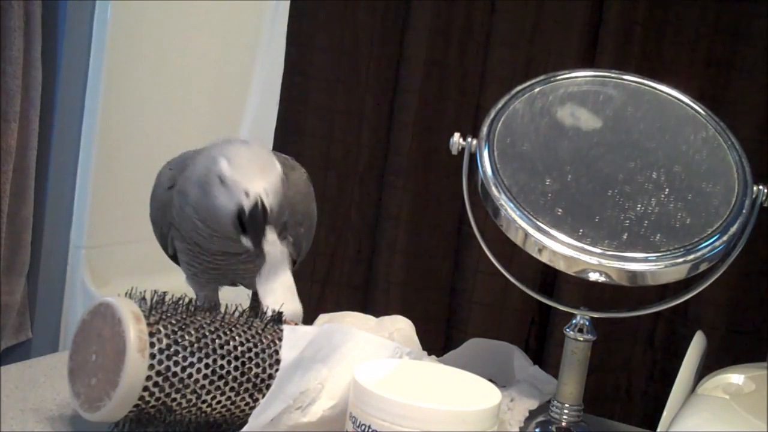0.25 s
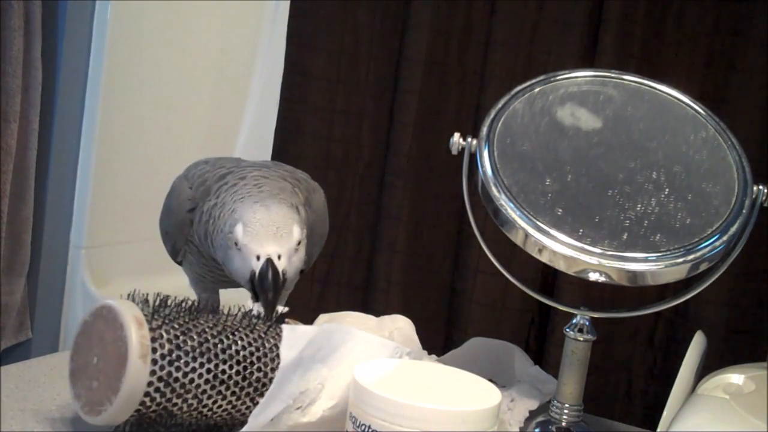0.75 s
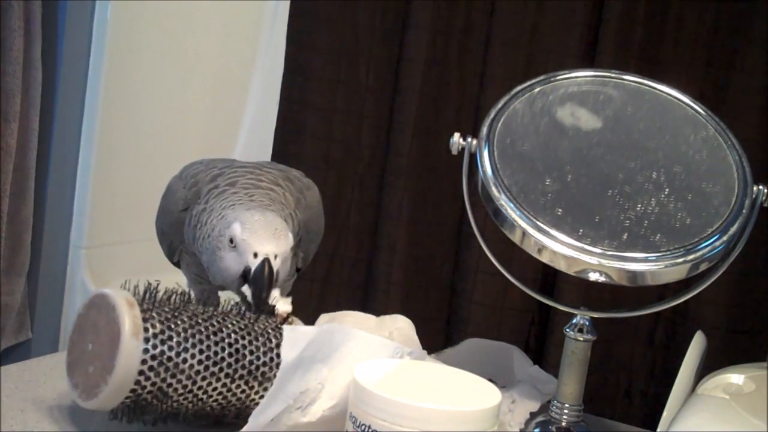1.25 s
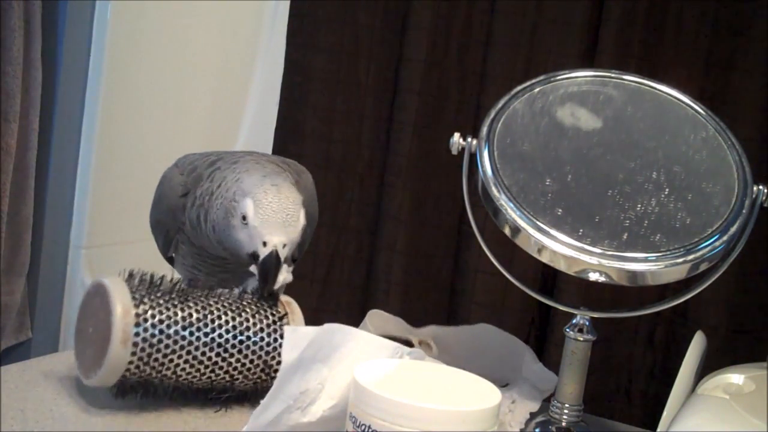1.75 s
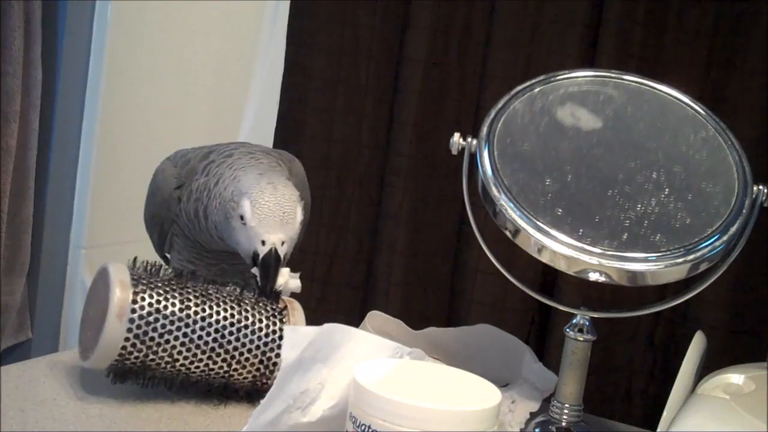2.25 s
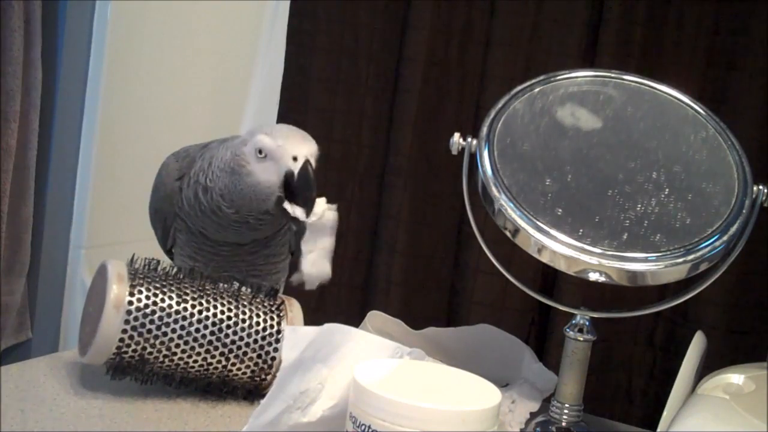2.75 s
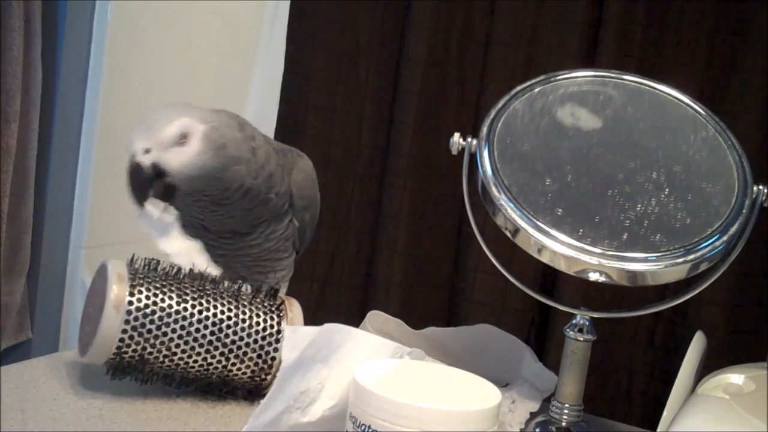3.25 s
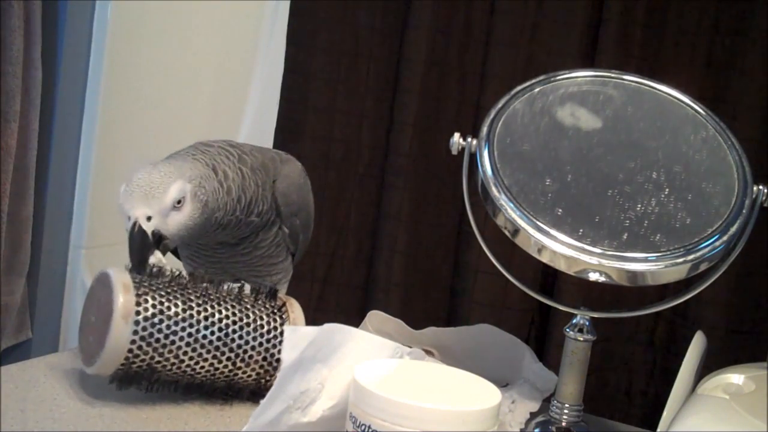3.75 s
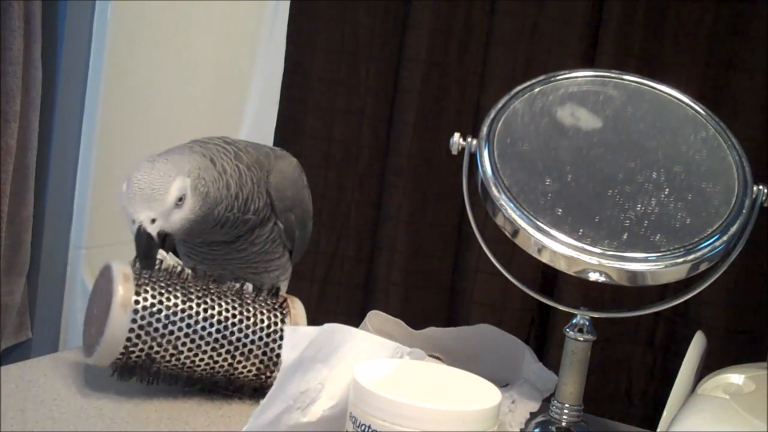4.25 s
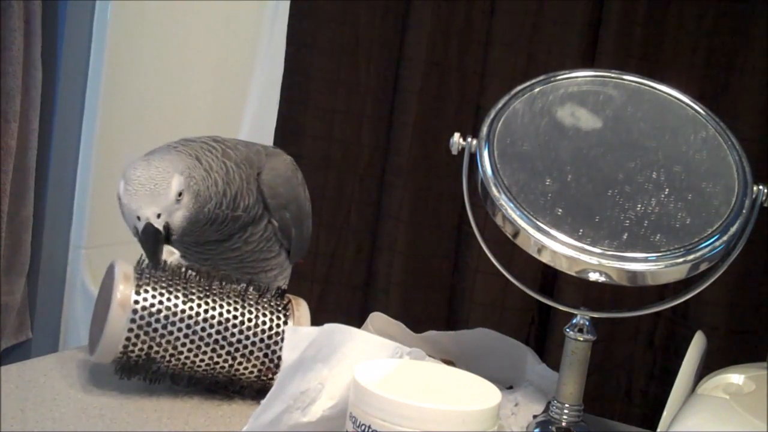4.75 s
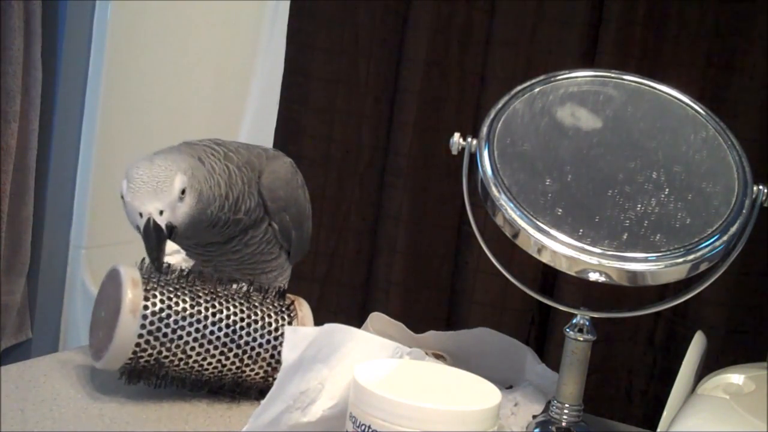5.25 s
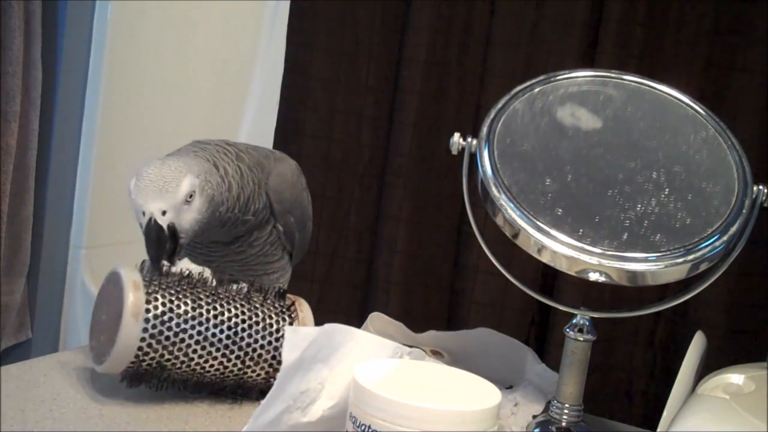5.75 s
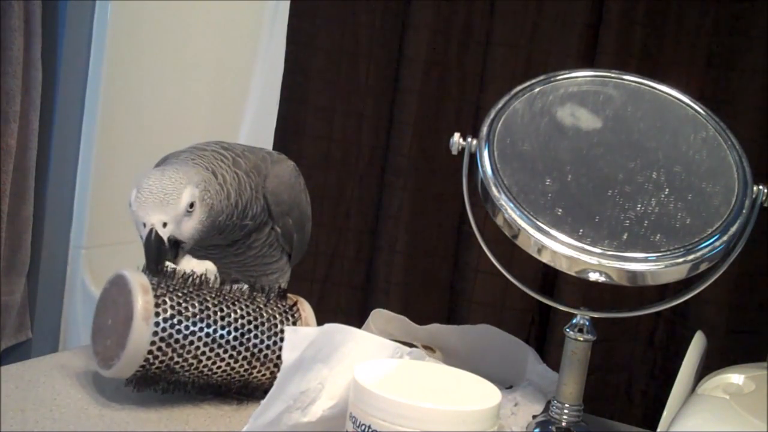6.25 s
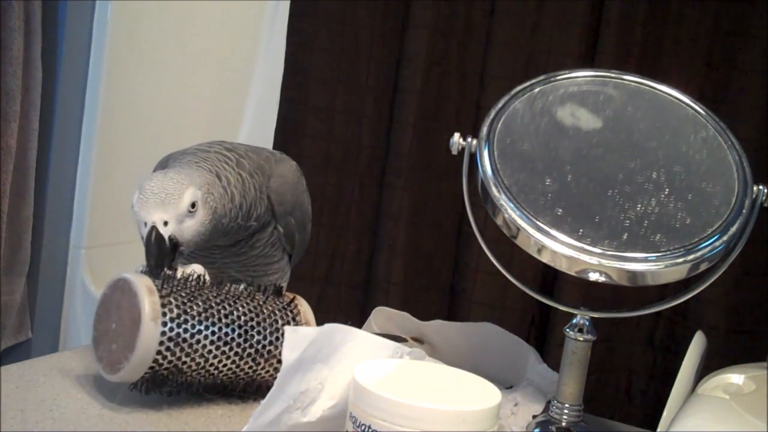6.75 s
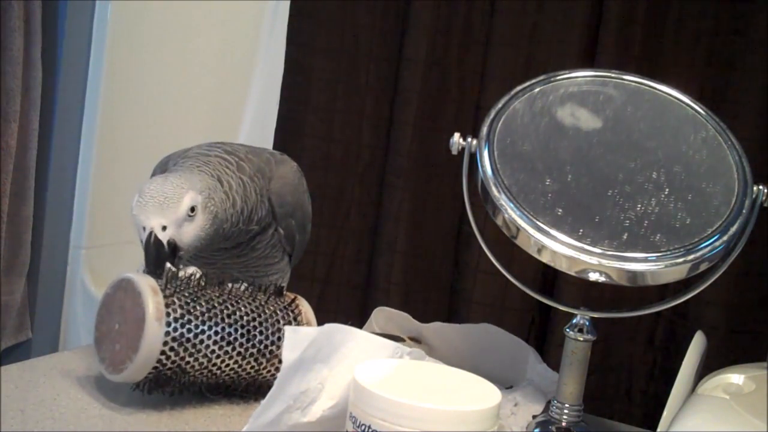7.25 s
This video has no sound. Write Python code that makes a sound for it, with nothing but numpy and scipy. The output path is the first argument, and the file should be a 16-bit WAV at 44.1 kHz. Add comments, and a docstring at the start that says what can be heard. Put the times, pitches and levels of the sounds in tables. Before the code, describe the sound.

Steady soft ventilation hiss and a very faint low mains hum fill a small bathroom with a short, bright ring. From the start a parrot's beak crackles tissue in short, thin, dry bites, close and left of centre. At 0.67 s the round hairbrush beneath it gives a muted knock; light bristle ticks follow. Around 1.15-1.65 s it rolls: a raspy bristle scrape, crowded sharp snaps, soft bumps and low counter rumble. At 1.85 s comes the loudest event, a hard hollow clack with smaller rattling rebounds. A gentler roll with ticks and dull bumps comes at 2.25-2.5 s. Then mainly delicate paper crackling continues, with a modest double knock near 4.34 s and isolated ticks. A small snap sounds at 6.5 s; the faint rustle stops at about 6.55 s, leaving sparse, quiet nibbles and ticks over the hiss until 7.5 s.

```python
"""Ventilation hiss and mains hum run throughout; from the start a parrot's beak crackles tissue paper in short bites.
From 0.67 s the round hairbrush it stands on snaps (noise burst and ringing bristle) and knocks (struck modes).
From 0.75 s it rolls at times: bristles scrape as filtered impulses and the counter rumbles under random steps.
Snaps crowd near 1.2 s, the hardest knock falls at 1.85 s, then both thin out; the rustle between bites stops
at 6.55 s and the last snaps and bites follow. Noise-built reflections give a short bathroom ring."""
import sys
import numpy as np
from scipy import signal
from scipy.fft import rfft, irfft
from scipy.io import wavfile
from scipy.ndimage import uniform_filter1d

SR = 44100
rng = np.random.default_rng(int(sys.argv[2]) if len(sys.argv) > 2 else 0)


def inscribe(sig):
    """Save sig as 16-bit PCM at rate SR to the path in sys.argv[1].

    A 1-D sig is mono; a 2-D sig holds one channel per row.
    Samples are clipped to [-1, 1] before scaling.
    """
    pcm = np.round(np.clip(np.atleast_2d(sig).T, -1, 1) * 32767)
    wavfile.write(sys.argv[1], SR, pcm.astype(np.int16))


N = 331632
TIME_S = np.arange(N) / SR
GRID_HZ = np.fft.rfftfreq(1024, 1 / SR)


def amp(db):
    """Converts dB to an amplitude factor."""
    return 10 ** (np.asarray(db) / 20)


def unit(x):
    """Scales to an rms of one."""
    return x / np.sqrt(np.mean(x ** 2) + 1e-20)


def read(points, hz):
    """Reads a table on a logarithmic frequency axis."""
    f, value = np.transpose(points)
    return np.interp(np.log(hz + 1), np.log(f + 1), value)


def bump(hz, centre_hz, width_hz):
    """A bell of height one."""
    return np.exp(-.5 * ((hz - centre_hz) / width_hz) ** 2)


def add(mix, start_s, sound):
    """Mixes a sound in at a time."""
    part = mix[..., max(round(start_s * SR), 0):][..., :sound.shape[-1]]
    part += sound[..., :part.shape[-1]]


def butter(x, order, hz, kind="low"):
    """Butterworth filter."""
    return signal.sosfilt(signal.butter(order, hz, btype=kind, fs=SR, output="sos"), x)


def colour(x, gain_db):
    """Minimum-phase filter with gain_db on GRID_HZ."""
    log_gain = np.log(amp(np.concatenate([gain_db, gain_db[-2:0:-1]])))
    taps = np.fft.ifft(np.exp(np.conj(signal.hilbert(log_gain)))).real
    return signal.oaconvolve(x, taps)[:len(x)]


def place(x, side_db):
    """Pans the treble left at constant mean power; bass stays near the middle."""
    tilt_db = side_db * read([(2500, 0.047), (6000, 0.18), (8000, 0.87), (12000, 1.35)], GRID_HZ)
    mean_db = 10 * np.log10((1 + amp(tilt_db) ** 2) / 2)
    return np.array([colour(x, tilt_db - mean_db), colour(x, -mean_db)])


def alike(z, same):
    """Mixes the left spectrum into the right, by likeness 0-1."""
    z[1] = same * z[0] + np.sqrt(1 - same ** 2) * z[1]


def ring(modes, t):
    """Struck modes, dying away; neighbours swing in opposite directions."""
    out = np.zeros(len(t))
    for k, (hz, db, t60_s) in enumerate(modes):
        out += (-1) ** k * amp(db - 60 * t / t60_s) * np.sin(2 * np.pi * hz * t)
    return out


def crackle(per_s, spread_db):
    """Tiny slips at random moments: most are weak, a few strong."""
    size = amp(spread_db * np.minimum(rng.exponential(1, N), 4)) * rng.choice([-1, 1], N)
    return unit(size * (rng.random(N) < per_s / SR))


# ventilation spectrum: (frequency [Hz], relative level [dB per Hz])
AIR = [(20, -37), (45, -6), (62, -8.5), (90, -7.5), (140, -10.5), (230, -8), (400, -9.5), (760, -12.5),
       (1500, -15), (4600, -17), (8000, -22), (10000, -21.5), (14200, -23), (14700, -67)]
# ventilation balance, vent on the left: (frequency [Hz], left-right [dB])
AIR_SIDE = [(60, 2.5), (200, 5), (700, 9), (1300, 7.5), (2400, 4.5), (5000, 0.5), (15000, 1)]


def air(hiss_db=-59.5, hum_hz=59.2, hum_db=-72.5):
    """Steady ventilation hiss, partly alike in both ears at low frequencies, and a mains-hum sine."""
    hz = np.fft.rfftfreq(N, 1 / SR)
    z = rfft(rng.standard_normal((2, N)))
    alike(z, np.clip(read([(60, 0.11), (300, 0.3), (700, 0.031), (3000, 0.018)], hz), 0, 1))
    z *= amp(read(AIR, hz) + np.array([[.5], [-.5]]) * read(AIR_SIDE, hz))
    hiss = amp(hiss_db) * unit(irfft(z, N))
    hum = amp(hum_db) * np.sqrt(2) * np.sin(2 * np.pi * hum_hz * TIME_S)
    return hiss + hum


# room decay: (frequency [Hz], t60 [s])
ROOM_T60 = [(120, 0.89), (320, 0.37), (840, 0.36), (2200, 0.3561), (6000, 0.22), (14000, 0.28)]
# likeness of the ears: (frequency [Hz], likeness [0-1])
ROOM_SAME = [(100, 0.8), (600, 1), (1400, 0.3), (3000, 0.14), (6000, 0.052)]
# room balance: (frequency [Hz], left-right [dB])
ROOM_SIDE = [(1000, -1), (6000, 1.5), (9000, 9.5), (14000, 15)]


def room(x, delay_s=0.00082):
    """Dense reflections from close tiled walls, each band dying at its own speed."""
    shape = (2, SR // 2)
    taps = rng.choice([-1., 1.], shape) * (rng.random(shape) < 1 / 4)
    hz, t, z = signal.stft(taps, SR, nperseg=256)
    alike(z, np.clip(read(ROOM_SAME, hz), 0, 1)[:, None])
    z[1] *= amp(-read(ROOM_SIDE, hz))[:, None]
    decay = amp(-60 * t / read(ROOM_T60, hz)[:, None])
    tail = signal.istft(z * decay, SR, nperseg=256)[1]
    # fades in from 0.5 to 1.5 delays
    tail *= np.clip(np.arange(tail.shape[1]) / SR / delay_s - .5, 0, 1)
    return signal.fftconvolve(x[None], tail / np.linalg.norm(tail[0]), axes=1)[:, :N]


# brush rolling: (start [s], length [s], relative bristle scrape [dB], relative counter rumble [dB])
ROLLS = [(0.75, 0.16, -58, -57.5), (1.151, .27, -38.5, -45), (1.382, 0.29, -42, -64),
         (2.253, 0.25, -51, -49.5), (3.57, 0.39, -63, -64.5), (4.216, .2, -63, -53.5)]


def rolling(levels_db, top_share=0.36, power=1.43):
    """Rolling strength: each roll speeds up and comes to rest in one arch."""
    out = np.zeros(N)
    for (start_s, length_s, _, _), db in zip(ROLLS, levels_db):
        progress = np.arange(0, length_s, 1 / SR) / length_s
        turn = np.interp(progress, [0, top_share, 1], [0, .5, 1])
        add(out, start_s, amp(db) * abs(np.sin(np.pi * turn)) ** power)
    return out


# counter top modes: (frequency [Hz], relative level [dB], t60 before damping by the brush [s])
COUNTER = [(126.4, -0.5, 0.087), (227, -1.5, 0.33), (325.6, -19.5, 0.41), (391.5, 2, 0.2), (440, -4, 0.92),
           (459.5, 0, 0.24), (595, -13, 0.23), (681, -19, 0.26), (749, 5, 0.35), (850, -12, 0.32),
           (920, 6, .25), (1195, 10, 0.35)]


def roll(trim_db=-2, soft_hz=330, damping_s=0.084, room_db=-8):
    """Bristle after bristle takes the load and keeps the low modes of the counter rumbling."""
    strength = rolling([rumble_db for _, _, _, rumble_db in ROLLS])
    steps = crackle(per_s=210, spread_db=0.5) * amp(trim_db) * strength
    t = np.arange(SR // 3) / SR
    body = ring(COUNTER, t) * np.exp(-t / damping_s)
    body = butter(body, 2, soft_hz)
    out = signal.fftconvolve(steps, body / np.linalg.norm(body))[:N]
    return out + amp(room_db) * room(out)


# scrape spectrum: (frequency [Hz], relative level [dB per Hz])
DRAG_COLOUR = [(80, -26), (250, -26), (700, -8.5), (1300, -11.5), (2100, -8.5), (3400, -8.5), (5000, -3),
               (7500, 0.5), (10000, -13), (14000, -17), (16000, -59)]


def drag(trim_db=-4, room_db=0):
    """Many bristle tips stick and slip as the brush rolls."""
    tips = unit(colour(crackle(per_s=2400, spread_db=2.5), read(DRAG_COLOUR, GRID_HZ)))
    tips *= amp(trim_db) * rolling([scrape_db for _, _, scrape_db, _ in ROLLS])
    return place(tips, side_db=11) + amp(room_db) * room(tips)


# brush on counter: (time [s], peak before panning and room [dB], hardness as cut-off [Hz], rocking gain [dB])
KNOCKS = [(0.667, -22.5, 800, 4), (.677, -35, 790, 11), (0.781, -41.5, 700, -5), (.835, -34, 930, 8),
          (1.059, -42, 300, 14), (1.165, -32.5, 506, 13), (1.197, -32.5, 300, 7), (1.232, -37, 800, -5),
          (1.275, -31.5, 910, -8), (1.304, -38.5, 304, 1), (1.339, -36, 617, 7), (1.8503, -25.5, 2500, -4),
          (1.8526, -6.5, 4070, -1.5), (1.872, -18.5, 1200, -21), (1.8945, -21, 1700, -1),
          (1.904, -30, 990, -9), (1.9468, -31, 1480, -13), (2.142, -51, 280, 2), (2.282, -39.5, 296, 21),
          (2.326, -40, 450, 16), (2.366, -32, 580, 14), (2.459, -40.5, 395, 12), (4.335, -24, 820, -7),
          (4.344, -21, 585, -1), (6.24, -47.5, 230, 10), (6.492, -42, 165, 5)]
# two modes of rocking on the bristles, then the hollow barrel: (frequency [Hz], relative level [dB], t60 [s])
BARREL = [(116, -29, 0.097), (214.3, -17.5, 0.085), (457, 0.5, 0.025), (650, 1, 0.029), (988, 2.5, 0.0088),
          (1940, -3, 0.0097), (2600, -9, 0.011), (4360, 1, 0.0056), (5160, 0.5, 0.0026)]


def knocks(counter_db=-32, room_db=-7, lowest_hz=75, barrel_low_hz=140, damping_s=0.088):
    """The brush drops on the counter and rocks on its bristles; a softer landing leaves only the low modes."""
    t = np.arange(SR // 2) / SR
    out = np.zeros(N)
    rocking = ring(BARREL[:2], t)
    # the barrel's ring carries little bass
    barrel = butter(ring(BARREL[2:], t), 2, barrel_low_hz, "high")
    spots = rng.choice([-1, 1], (len(KNOCKS), len(COUNTER)))
    for (start_s, db, hard_hz, rock_db), spot in zip(KNOCKS, spots):
        # the spot hit sets each mode's starting direction; the landed brush damps them
        counter = sum(way * ring([mode], t) for way, mode in zip(spot, COUNTER))
        counter = counter * np.exp(-t / damping_s)
        body = barrel + amp(rock_db) * rocking + amp(counter_db) * counter
        body = butter(body, 4, lowest_hz, "high")
        blow = butter(body, 3, min(hard_hz, SR / 3))
        add(out, start_s, amp(db) * blow / abs(blow).max())
    return place(out, side_db=26) + amp(room_db) * room(out)


# bristles and beak: (time [s], relative level [dB], ring [Hz], relative barrel share [dB],
# beaming, drier and further left [dB])
SNAPS = [(0.6676, -48, 7200, -10, -1), (0.804, -48, 7500, -10, 2), (0.831, -51, 6700, -3, 7),
         (0.8352, -44.5, 6900, -11, 7), (0.9239, -44.5, 7450, -14.5, 0.5), (1.0912, -44.5, 7700, -12, 29),
         (1.1622, -21.5, 8300, -24, 11), (1.1668, -34, 7500, -14, 6), (1.1807, -28, 6100, -16, 2),
         (1.1957, -18, 7770, -19.5, 36), (1.2295, -34, 7040, -7.5, 6), (1.234, -38, 6850, -15, 6),
         (1.2388, -23, 7440, -32, 12), (1.253, -32, 6400, -13.5, 6), (1.299, -37, 7350, -3.5, 23),
         (1.302, -39, 6550, -11, 7), (1.314, -37.5, 5800, -15, 10), (1.348, -44.5, 6700, -7, 5),
         (1.647, -52.5, 7400, -5.5, 6), (1.853, -28, 5350, -13, 1), (1.9718, -44.5, 6300, -21, 1),
         (2.0692, -45.5, 5850, -7, 9), (2.262, -46.5, 7400, -24, 2), (2.279, -27.5, 6300, -21, 19),
         (2.2839, -31.5, 4800, -21, 0), (2.3225, -35.5, 4640, -9, 4), (2.3255, -26, 6900, -26, 9),
         (2.3577, -32.5, 6570, -17.5, 12), (2.456, -42, 6630, -12.5, 2.5), (2.7744, -50, 1700, -12, 9),
         (2.8545, -50.5, 7700, -24, 3.5), (3.6104, -45, 2970, -12, 4), (4.3377, -49, 1890, -6, 1.5),
         (4.726, -55, 7000, -20, 2), (4.8485, -48.5, 1710, -3, 4.5), (4.9269, -49.5, 7860, -8.5, 1),
         (5.206, -55, 5760, -25, 2), (5.3238, -49, 6560, -8.5, 2), (5.5726, -47.5, 6200, -13, 2.5),
         (6.2049, -51, 7650, -8.5, 8), (6.494, -37, 3980, -9, 5), (6.9883, -58.5, 4220, -8, -6.5),
         (7.2942, -48, 7400, -10.5, 1), (7.3332, -50.5, 6160, -8, 2)]
# scratch spectrum: (frequency [Hz], relative level [dB per Hz])
SNAP_COLOUR = [(100, -30), (600, -42.5), (2000, -17.5), (3300, -30), (4600, -2.5), (6500, 1.5),
               (8200, -0.5), (10000, -11.5), (14000, -20.5), (16000, -61)]
# shaken barrel spectrum: (frequency [Hz], relative level [dB per Hz])
BARREL_COLOUR = [(100, -24), (700, 6), (1300, -4), (1900, 6), (3000, 8), (4200, -11), (6000, -23.5),
                 (16000, -45)]


def snaps(slip_s=0.0014, rise_s=0.0004, ring_s=0.0002, ring_db=-2, trim_db=-1, room_db=4.5, side_db=4):
    """A bristle slips free within a few milliseconds, rings high and shakes the barrel."""
    t = np.arange(1024) / SR
    spread = np.sqrt(.005 * SR / len(t))  # energy of a 5 ms burst at the given rms
    near, mono = np.zeros((2, N)), np.zeros(N)
    grits = rng.choice([-1., 1.], (len(SNAPS), len(t)))
    for (start_s, db, hz, share_db, beam_db), grit in zip(SNAPS, grits):
        release = grit * (1 - np.exp(-t / rise_s)) * np.exp(-t / slip_s)
        scratch = unit(colour(release, read(SNAP_COLOUR, GRID_HZ)))
        twang = unit(t * np.exp(-t / ring_s) * np.sin(2 * np.pi * hz * t))
        barrel = unit(colour(release, read(BARREL_COLOUR, GRID_HZ)))
        bristle = unit(scratch + amp(ring_db) * twang)
        snap = spread * amp(db + trim_db) * (bristle + amp(share_db) * barrel)
        add(near, start_s, place(snap, side_db + beam_db))
        add(mono, start_s, snap * amp(-beam_db))
    return near + amp(room_db) * room(mono)


def bite(length_s, attack_s=0.0093, sag_db=-2, release_s=0.0095):
    """Force of the beak: quick closing, sagging hold, release."""
    t = np.arange(0, length_s + 10 * release_s, 1 / SR)
    attack = np.minimum(t / attack_s, 1)
    hold = amp(sag_db * np.minimum(t / length_s, 1))
    release = np.exp(-np.maximum(t - length_s, 0) / release_s)
    return attack * hold * release


# bites and tugs at the tissue: (start [s], length [s], relative level [dB], crackle centre [Hz])
BITES = [(0.0, 0.0077, -49.5, 6400), (0.316, 0.021, -50.5, 6400), (0.382, 0.047, -56.5, 6130),
         (0.466, 0.064, -51, 6400), (0.535, 0.072, -53, 7840), (0.697, 0.043, -55.5, 7400),
         (0.823, 0.083, -52.5, 7100), (0.943, 0.042, -56, 7000), (1.038, 0.096, -55.5, 7300),
         (1.725, 0.04, -54, 7250), (1.985, 0.13, -56, 7300), (2.152, 0.034, -56, 7480),
         (2.576, 0.12, -58, 5520), (2.785, 0.032, -47, 5910), (2.924, 0.08, -56, 5340),
         (3.101, .055, -53, 6700), (3.257, 0.075, -57, 6900), (3.412, 0.06, -54.5, 6230),
         (3.642, 0.065, -59, 6600), (3.826, 0.032, -53, 6870), (4.022, 0.1, -54.5, 6370),
         (4.185, 0.046, -50.5, 6560), (4.241, 0.028, -49, 6770), (4.328, 0.078, -57, 6500),
         (4.467, .03, -60, 6560), (4.552, 0.079, -55, 5690), (4.635, 0.051, -50.5, 6460),
         (4.729, 0.07, -50, 6760), (4.855, 0.054, -55.5, 7400), (5.057, .1, -62, 6600),
         (5.202, 0.051, -48, 5560), (5.316, 0.047, -56, 6850), (5.469, 0.086, -53.5, 6700),
         (5.668, 0.15, -58, 6640), (5.885, 0.026, -54.5, 7150), (5.966, 0.03, -56, 6800),
         (6.285, 0.21, -60, 6700), (6.967, 0.024, -63, 6700), (7.124, 0.049, -53, 6950),
         (7.194, 0.2, -63, 6960), (7.472, .035, -62, 6500)]
# paper spectrum before the moving focus: (frequency [Hz], relative level [dB per Hz])
PAPER_COLOUR = [(100, -15), (500, -22), (1800, -12), (3600, -12.5), (5000, -1.5), (6500, -5), (8000, -6),
                (9800, -12.5), (14000, -23), (15200, -43)]


def paper(trim_db=-3, rustle_db=-64.5, rustle_end_s=6.55, focus_db=7, focus_width_hz=900, clump_db=2, room_db=-2):
    """Bites break fibres in a crackle whose pitch shifts as the beak turns the scrap; faint rustle between."""
    starts_s, lengths_s, _, centres_hz = np.transpose(BITES)
    fibres = colour(crackle(per_s=2500, spread_db=2.5), read(PAPER_COLOUR, GRID_HZ))
    hz, t, z = signal.stft(fibres, SR, nperseg=256)
    focus_hz = np.interp(t, starts_s + lengths_s / 2, centres_hz)
    z *= amp(focus_db * bump(hz[:, None], focus_hz, focus_width_hz))
    fibres = unit(signal.istft(z, SR, nperseg=256)[1][:N])
    power = amp(rustle_db) ** 2 * (TIME_S < rustle_end_s)
    for start_s, length_s, db, _ in BITES:
        add(power, start_s, (amp(db) * bite(length_s)) ** 2)
    # fibres give way in clumps
    clumps = unit(uniform_filter1d(rng.standard_normal(N), SR // 90))
    fibres *= np.sqrt(power) * amp(trim_db + clump_db * clumps)
    return place(fibres, side_db=9) + amp(room_db) * room(fibres)


def scene():
    """Everything on the counter, over the room tone."""
    return air() + roll() + drag() + knocks() + snaps() + paper()


# left and right microphone port resonances: (frequency [Hz], width [Hz], gain [dB])
PORTS = [(7600, 584, 7), (6600, 440, 6)]


def record(dry, edge_hz=14900):
    """Each microphone port has its own treble resonance; then the band limit."""
    heard = np.array([colour(x, db * bump(GRID_HZ, hz, width_hz))
                      for x, (hz, width_hz, db) in zip(dry, PORTS)])
    low_pass = signal.firwin(401, edge_hz, window=("kaiser", 9), fs=SR)
    return signal.oaconvolve(heard, low_pass[None], "same")


dry = scene()
out = record(dry)
inscribe(out)
```